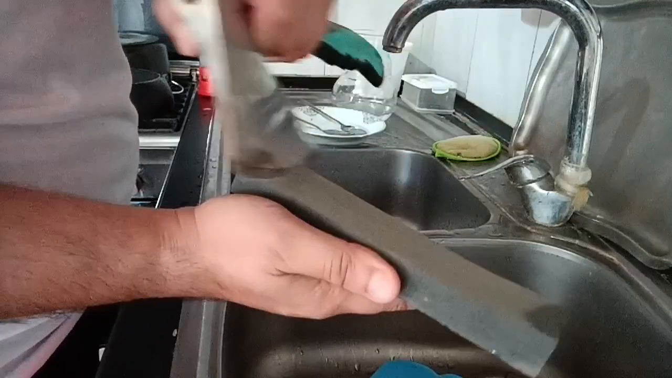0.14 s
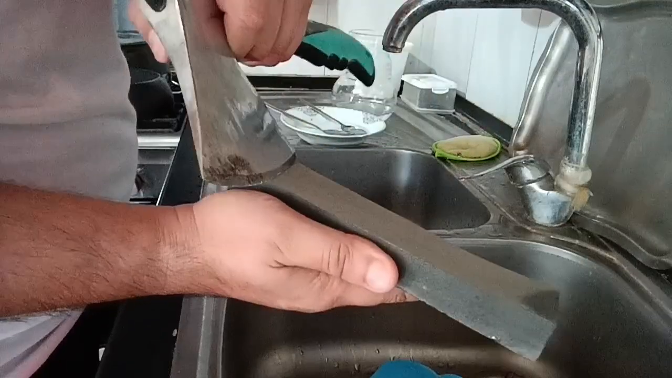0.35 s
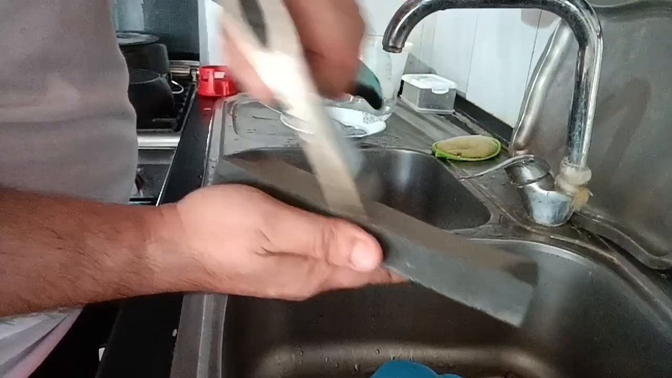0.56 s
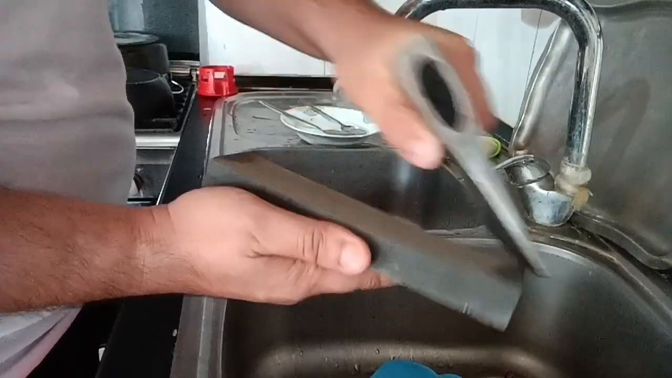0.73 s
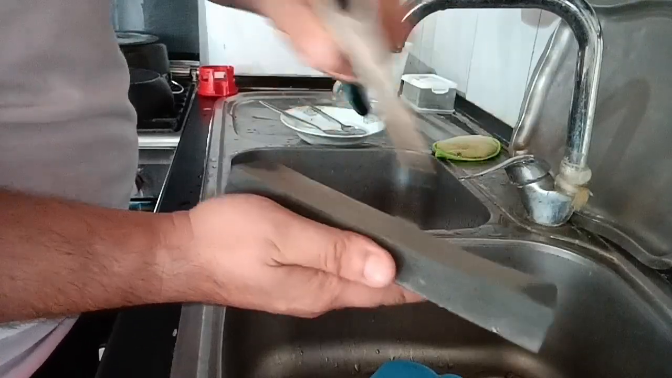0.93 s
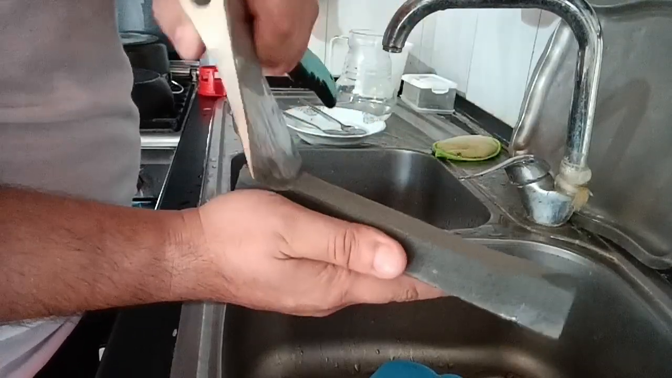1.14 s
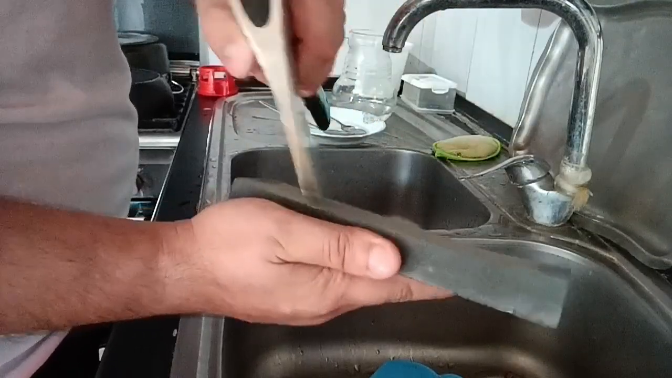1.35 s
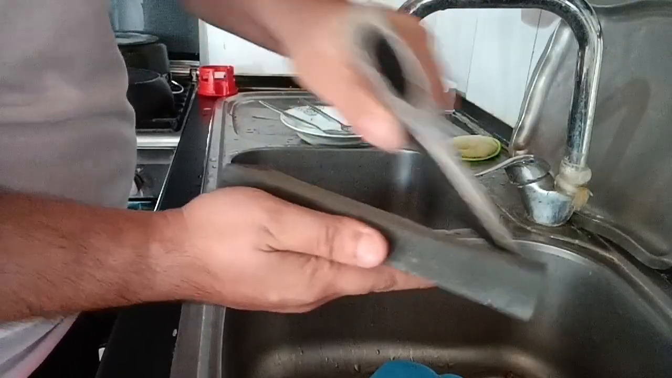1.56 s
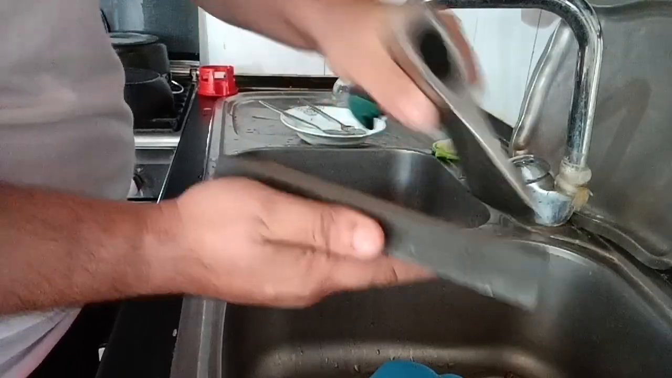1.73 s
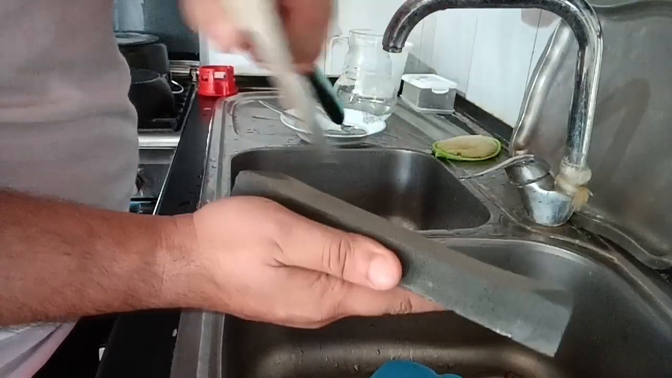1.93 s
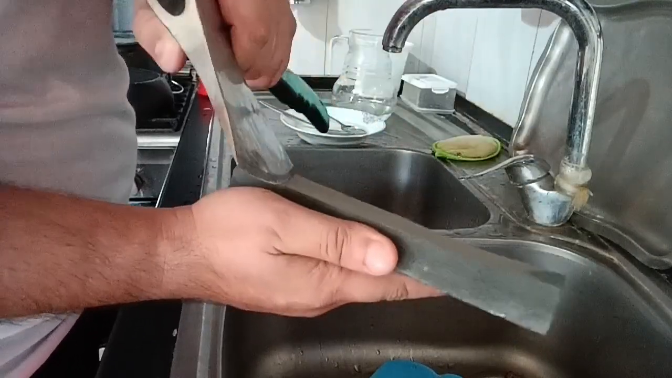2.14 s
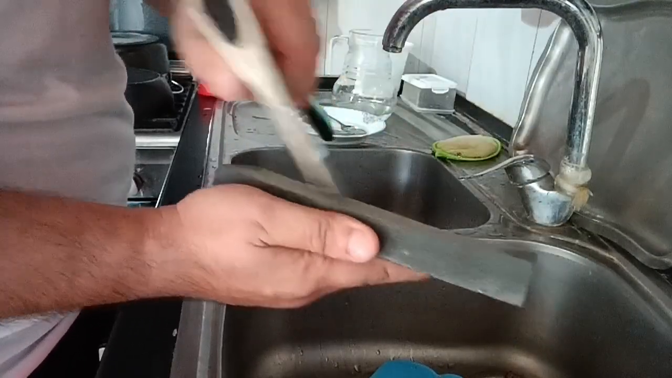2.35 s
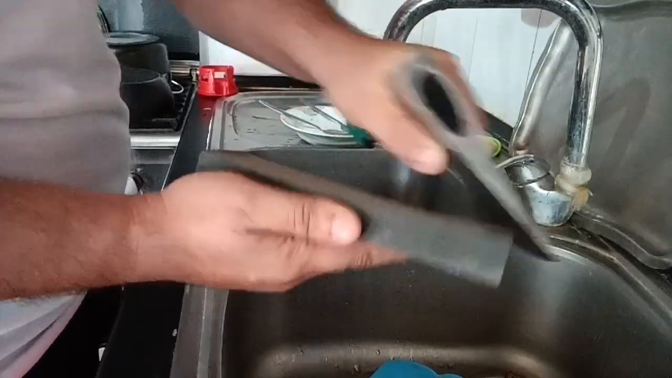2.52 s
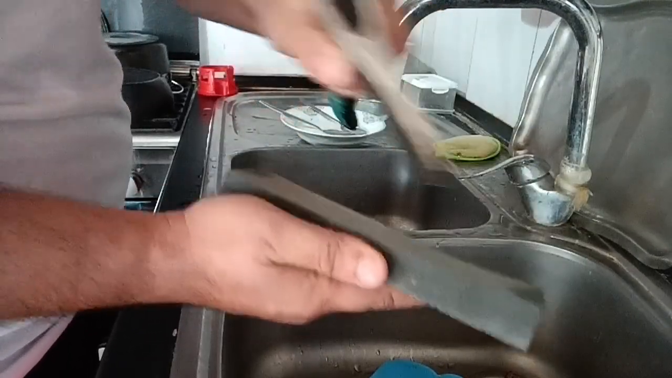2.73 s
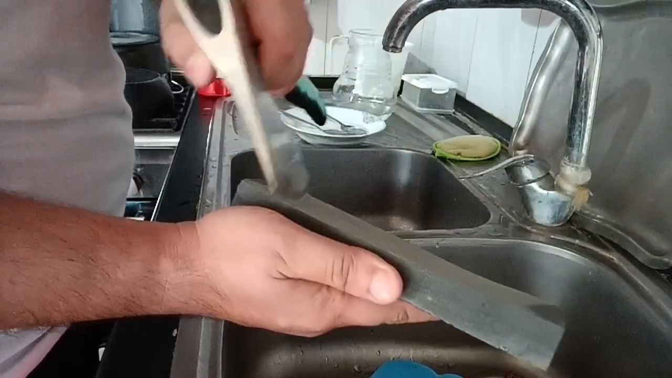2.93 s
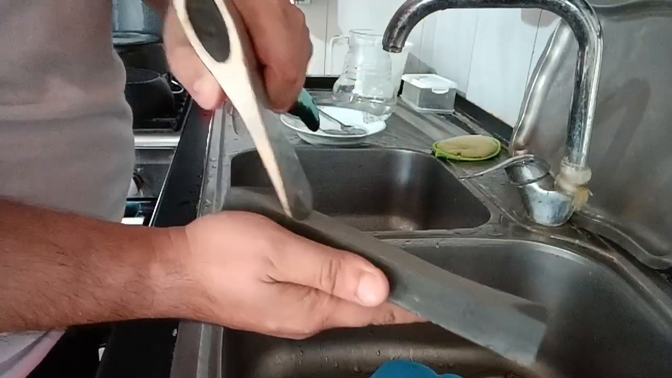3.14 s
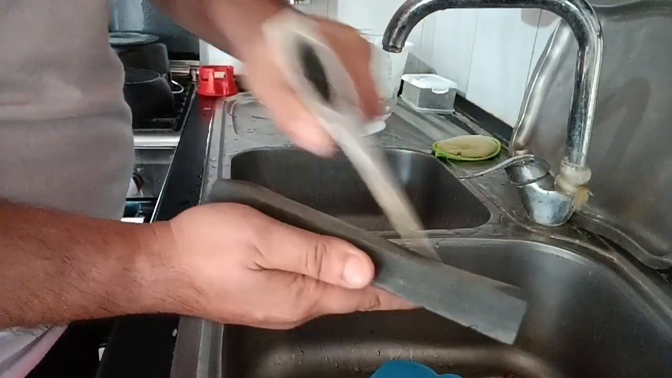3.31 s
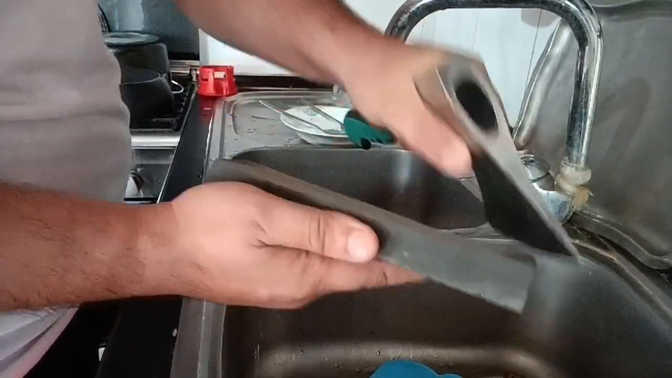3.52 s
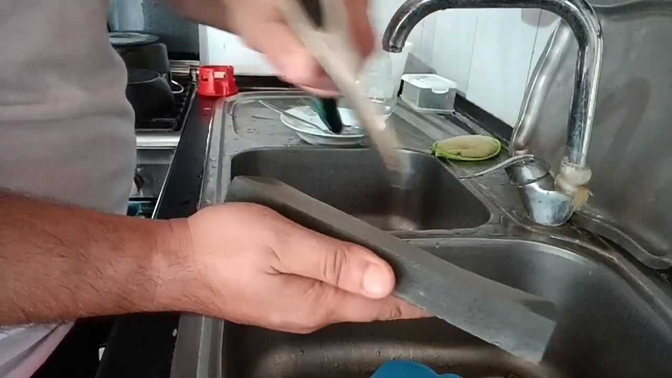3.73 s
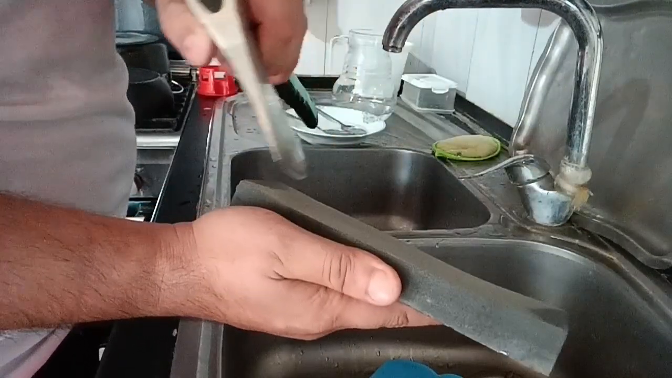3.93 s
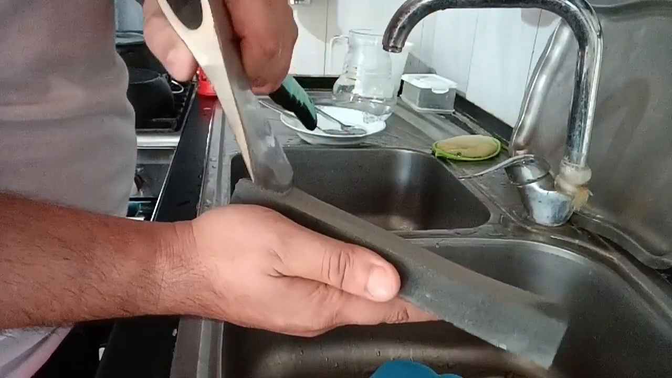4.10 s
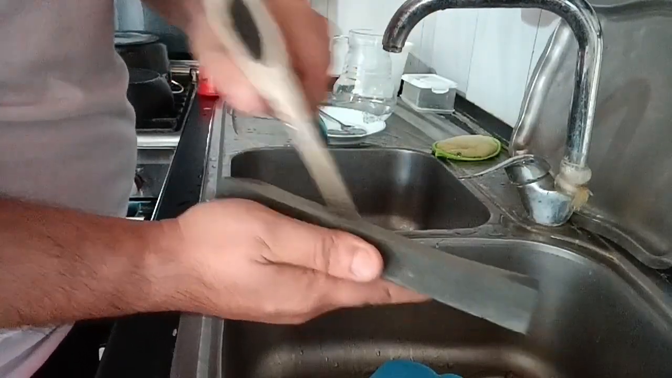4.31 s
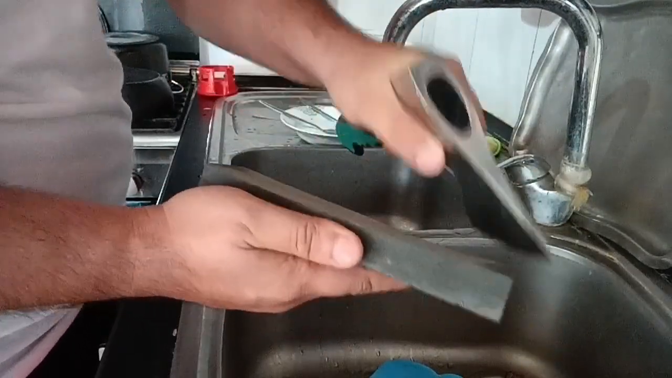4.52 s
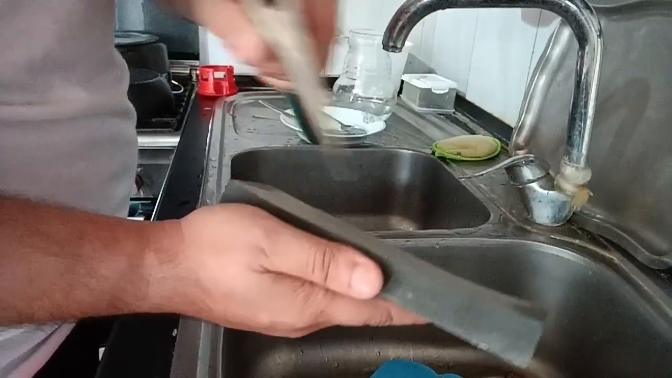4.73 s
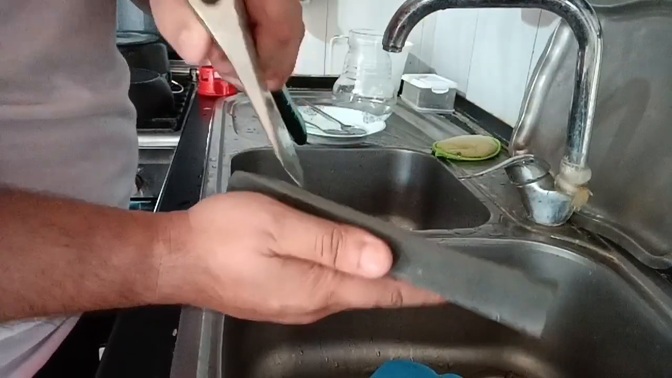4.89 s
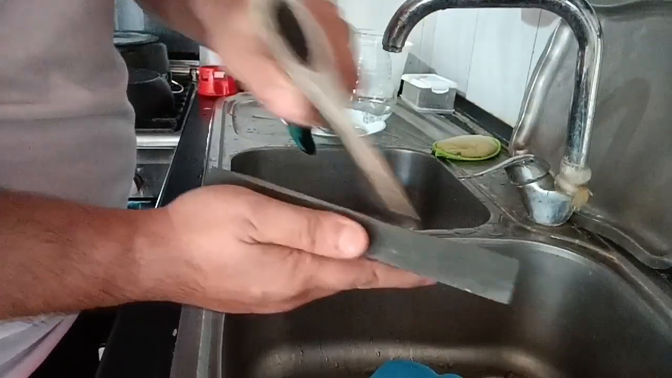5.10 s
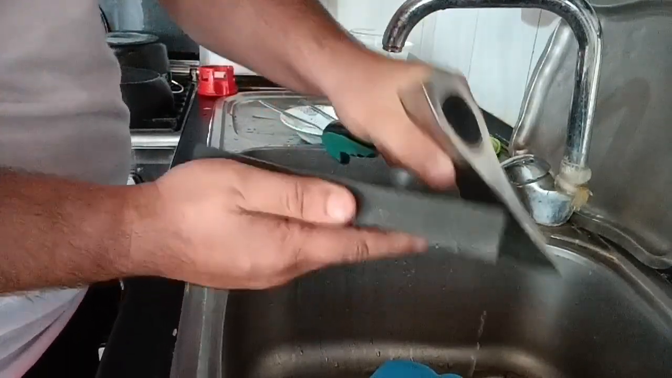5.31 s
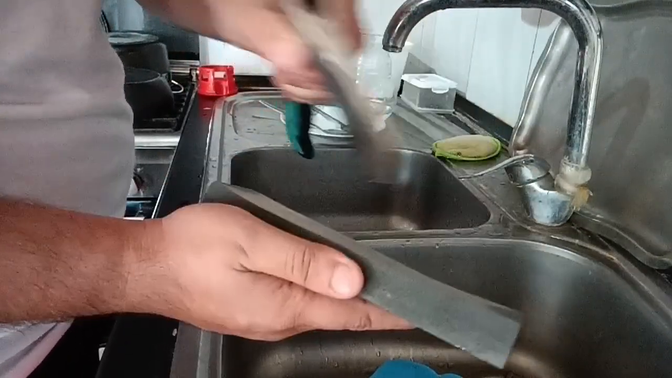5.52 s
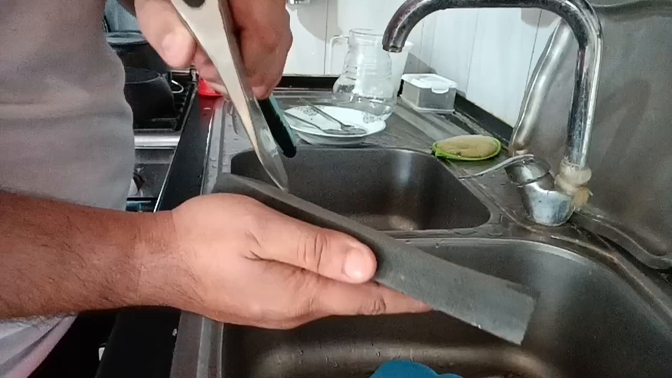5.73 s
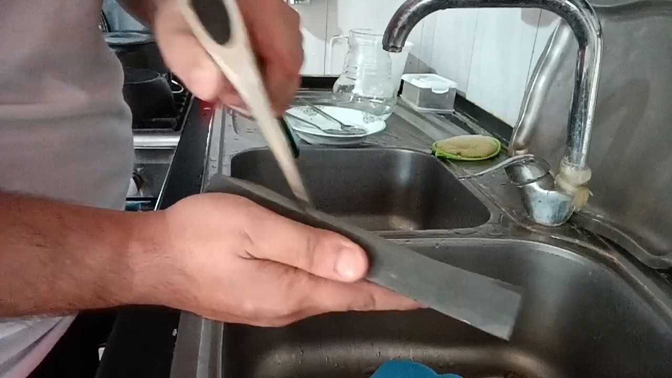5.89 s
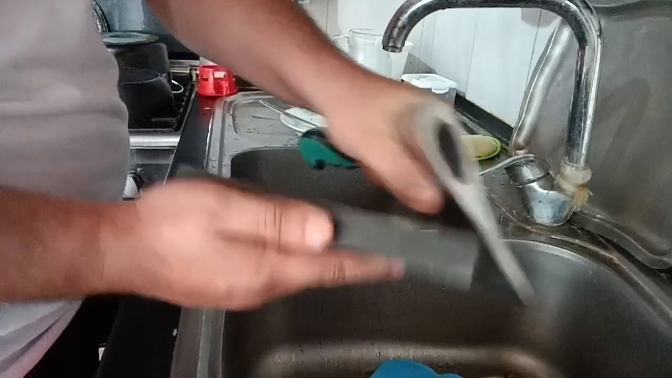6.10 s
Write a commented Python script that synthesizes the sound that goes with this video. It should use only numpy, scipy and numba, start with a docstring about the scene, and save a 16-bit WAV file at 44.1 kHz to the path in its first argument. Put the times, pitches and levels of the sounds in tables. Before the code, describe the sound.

A steel blade is sharpened on a wet, hand-held stone over a kitchen sink. Seven times, about once a second, the edge lands with a light knock, scrapes along the stone with a growing gritty hiss and slips off with a brief metallic ring. Short pauses separate the strokes. The sound is close, with slight room reverberation and a faint appliance hum.

```python
"""A steel blade is sharpened on a wet whetstone held over a sink in a tiled kitchen.
At first its ring dies away over room air and an appliance's faint hum and whine. Then, seven times,
the edge lands with a knock and is pushed along the stone: grit forces the blade's modes, which the
load stiffens and damps, until the edge slips off the end and they ring free.
The room reverberates throughout, and a faint tick comes before some of the landings."""
import sys
import numpy as np
from scipy import signal
from scipy.fft import rfft, irfft, next_fast_len
from scipy.io import wavfile
from scipy.ndimage import uniform_filter1d, map_coordinates
from numba import njit

SR = 44100
rng = np.random.default_rng(int(sys.argv[2]) if len(sys.argv) > 2 else 0)


def unload_wav(signal):
    """Save mono or channel-first audio to the path in sys.argv[1] as 16-bit WAV at rate SR, clipped to [-1, 1]."""
    wavfile.write(
        sys.argv[1],
        SR,
        np.round(np.clip(np.atleast_2d(signal).T, -1, 1) * 32767).astype(np.int16),
    )


N = 275694
LEAD = SR // 4  # samples computed before t = 0
M = N + LEAD

# spectrum of the room air: f/Hz, relative level/dB
AIR_SPECTRUM = [(20, -21.5), (45, -12), (65, -7.5), (130, -0.5), (300, -6), (420, -8.5), (1000, -16.5),
                (3000, -23.5), (4500, -34), (7000, -30), (10000, -39.5), (16000, -40.5)]
# appliance tones: f/Hz, drift/Hz, waver/dB, level/dB
HUM_TONES = [(99.5, 1.5, 3, -63), (150, 2, 4, -74), (342, 2, 4, -72), (3365, 1.2, 2, -87),
             (6400, 1.2, 2, -90), (6600, 1.2, 2, -92)]
# blade modes: free f/Hz, rise at full load/Hz, level within family/dB, free T60/s, loaded T60/s
BLADE_MODES = [(1483, 25, 0, .17, .045), (1512, 125, -1, .13, .04), (2620, 140, -6, .08, .02),
               (3900, 60, -10, .13, .025), (3985, 100, -8, .11, .022), (4918, 150, 0, .235, .022),
               (1780, 60, -13, .08, .02), (2960, 110, -9, .08, .02), (3140, 60, -12, .08, .025),
               (3390, 60, -15, .06, .02), (5540, 30, -20, .08, .03), (6250, 60, -15, .05, .012),
               (6520, 50, -12, .07, .016), (6750, 40, -16, .07, .025), (7320, 70, -9, .08, .013),
               (8960, 70, -10, .17, .03), (9740, 30, -26, .1, .05), (11200, 40, -26, .08, .025),
               (12630, 40, -20, .1, .03), (12850, 90, -18, .03, .008), (13790, 100, -17, .14, .02)]
# boundaries of the six families of modes: f/Hz
FAMILY_EDGES = [2200, 2800, 3600, 4500, 5400]
# reverberation time of the kitchen: f/Hz, T60/s
ROOM_DECAY = [(300, 0.12), (1500, 0.35), (6000, .25), (11000, 0.25), (15000, .13)]
# faint ticks: t/s, level/dB, f/Hz
TICKS = [(.159, -68, 550), (.995, -62, 930), (3.887, -67.5, 620), (5.534, -73, 2900)]
# edge meets stone: t/s, level/dB, then relative to it treble/dB, thud/dB, 5 kHz mode/dB, clack/dB
LANDINGS = [(0.339, -15, -24, -15, -28, -7.5), (1.22, -12.5, -36, -10.5, -25.5, -8.5),
            (2.176, -13, -20.5, -16.5, -14.5, 1), (3.061, -5, -28, -17.5, -25, -3),
            (4.216, -13, -26.5, -14, -34, -11), (5.01, -12.5, -18.5, -4, -17, 10.5),
            (5.89, -22.5, -16.5, -4.5, -30, 9)]
# resonances of the stone: f/Hz, bandwidth/Hz, level/dB
STONE_MODES = [(281.5, 88, 2.5), (359, 66, -5), (429, 10, 10.5), (635.8, 20, 14), (841.3, 11, 17),
               (980, 1300, 1), (1230, 22, -17.5)]
# resonances of stone and hand under a blow: f/Hz, bandwidth/Hz, level/dB
CLACK_MODES = [(1030, 380, -7), (1550, 450, 0), (2620, 450, -6), (3900, 600, -7)]
# scrape contour of the stroke that ends just before t = 0: t/s, low level/dB, upper level/dB
OPENING_CONTOUR = [(-.2, -26, -36), (-.07, -32.5, -26)]
# scrape contours, one for each later stroke: t/s, low level/dB, upper level/dB
CONTOURS = [
    [(0.36, -44.5, -60), (0.432, -55.5, -66), (0.518, -40, -26.5), (0.56, -33.5, -28.5),
     (0.582, -26, -24.5), (0.598, -30, -26), (0.638, -32, -25), (0.796, -25.5, -22.5), (0.815, -28.5, -31)],
    [(1.24, -35, -37.5), (1.278, -41, -36), (1.328, -41, -30.5), (1.368, -24.5, -25.5), (1.396, -33, -42),
     (1.424, -28.5, -19.5), (1.442, -35.5, -33), (1.468, -26, -14), (1.5, -27, -26.5), (1.52, -32.5, -23.5),
     (1.544, -30.5, -27), (1.634, -30, -21.5), (1.658, -32, -24), (1.698, -29, -20.5), (1.715, -21, -33)],
    [(2.2, -31.5, -36), (2.22, -37.5, -41.5), (2.276, -47.5, -52.5), (2.35, -30.5, -24.5),
     (2.392, -36, -28.5), (2.506, -22.5, -23), (2.55, -40.5, -21), (2.578, -17.5, -21.5), (2.6, -31, -26)],
    [(3.085, -32.5, -35), (3.101, -44, -42), (3.165, -46.5, -46), (3.193, -47, -31.5),
     (3.255, -33.5, -33.5), (3.429, -26, -18), (3.457, -25.5, -19), (3.485, -24, -23.5), (3.51, -30, -21)],
    [(4.235, -31.5, -42), (4.251, -39.5, -43), (4.281, -37.5, -34), (4.403, -30, -25.5),
     (4.417, -28, -30.5), (4.431, -23.5, -26.5), (4.507, -28.5, -21), (4.543, -21, -23),
     (4.56, -27.5, -28.5)],
    [(5.03, -25.5, -28), (5.046, -31, -33), (5.072, -33, -34.5), (5.096, -30, -26.5), (5.14, -26.5, -26.5),
     (5.252, -28.5, -23), (5.268, -20, -22), (5.292, -22.5, -20), (5.31, -25, -28)],
    [(5.905, -36, -33.5), (5.963, -46.5, -36), (6.019, -26, -26.5), (6.033, -32, -27), (6.055, -21, -27),
     (6.129, -39.5, -17), (6.147, -20.5, -20.5), (6.161, -22.5, -20), (6.175, -31.5, -29)],
]
# every stroke, the opening one first: landing load/1, full load/1, build/s, hold/s,
# time from end of hold to slip-off/s, 5 kHz boost at slip-off/dB, treble/dB
STROKES = [(.5, 0.7, .03, .01, 0.086, 3, -5), (0, .95, 0.099, 0.056, 0.087, 15.5, 2.8),
           (.12, .9, .25, .04, .1, -4.5, 1), (.12, 1, .1, .04, .085, 2, 0),
           (.12, 0.9, 0.12, 0.13, .11, -3.5, -0.5), (0.2, 0.85, 0.14, 0.081, 0.08, -2.5, 0.9),
           (0.5, 0.83, .06, .09, .11, 13, 1.8), (0.52, 0.71, 0.066, 0.058, 0.094, 11, 0.8)]
# rows are hiss, rumble and the low, 2.6, 3, 4, 5 kHz and high families: middling level/dB,
# slope on low level/1, slope on upper level/1, change at full load/dB, drift/(dB/s)
LAYERS = [(-48, -0.14, 1.3, -2.2, 9.5), (-40, 0.23, 0.48, 2.5, -2), (-26.5, 1.04, 0.15, 3.5, 0.9),
          (-38.5, 0.21, 0.87, 4.5, -13), (-31.5, 0.25, 0.9752, -2.55, 19), (-35, 0.04, 1.06, -1, 0.5),
          (-39, 0.14, 0.86, 6, -11), (-33.5, 0.09, 1.18, -0.2, 4.5)]
# spectrum of the grit hiss: f/Hz, relative level/dB
GRIT_SPECTRUM = [(200, -35.5), (700, -109), (2000, -21.5), (3500, 16), (7000, -2.5), (10500, 0.5),
                 (13000, 0), (15500, -5.5)]

AIR_DB, ROOM_DB, TOP_HZ = -63, -15, 15750
SINGING_MODE, NODE_DB = 5, 3  # row of the 5 kHz mode; wander of each mode's drive
EASE_S, EASE_LOAD, RIM_LOAD = .07, .15, .4  # the hand eases, then the edge catches the rim
SLIP_S = .03  # rise time of the slip-off boost
MID_LOW_DB, MID_UPPER_DB = -29, -28  # contour levels of a middling scrape


def amp(db):
    """Amplitude ratio: a factor of ten per 20 dB."""
    return 10 ** (np.asarray(db) / 20)


def unit(x):
    """Normalisation to rms 1."""
    return x / np.sqrt(np.mean(x ** 2) + 1e-20)


def along(points, hz):
    """Interpolation of (f/Hz, value) points on a logarithmic frequency axis."""
    f, value = np.transpose(points)
    return np.interp(np.log(hz + 1), np.log(f + 1), value)


def at(s):
    """Sample index of a time, counting the lead."""
    return int(round(s * SR)) + LEAD


def wobble(rate):
    """Slow random modulation: a spline through rate knots a second."""
    knots = rng.standard_normal(int(M * rate / SR) + 4)
    coarse = map_coordinates(knots, [np.arange(0, M, 16) * rate / SR])
    return np.repeat(coarse, 16)[:M]


def filtered(x, response):
    """Linear filtering: the spectrum is multiplied by a frequency response."""
    size = next_fast_len(x.shape[-1] + SR // 2)
    return irfft(rfft(x, size) * response(np.fft.rfftfreq(size, 1 / SR)), size)[..., :x.shape[-1]]


def resonate(x, modes):
    """Modal superposition: x drives second-order resonances of alternating sign."""
    return filtered(x, lambda f: sum((-1) ** k * amp(db) * 1j * f * width / (hz**2 - f**2 + 1j * f * width)
                                     for k, (hz, width, db) in enumerate(modes)))


def background():
    """Random modulation: the noise of room air and an appliance's tones waver slightly."""
    air = unit(filtered(rng.standard_normal(M), lambda f: amp(along(AIR_SPECTRUM, f))))
    out = air * amp(AIR_DB + .56 * wobble(.17) + .79 * wobble(6))
    for hz, drift_hz, waver_db, db in HUM_TONES:
        rms = uniform_filter1d(amp(db + waver_db * wobble(6.5)), size=32)
        phase = 2 * np.pi * np.cumsum(hz + drift_hz * wobble(29)) / SR
        out += rms * np.sqrt(2) * np.sin(phase)
    return out


@njit
def ring(rub, blows, load, omega, rise, gain, free_loss, loaded_loss):
    """Forced damped oscillators whose frequency and loss follow the load; rates are per sample."""
    out = np.zeros(len(load))
    for k in range(len(omega)):
        z = 0j
        for i in range(len(load)):
            if i % 16 == 0:
                loss = free_loss[k] + (loaded_loss[k] - free_loss[k]) * load[i]
                pole = np.exp(-loss + 1j * (omega[k] + rise[k] * load[i]))
                feed = 2 * np.sqrt(loss)  # keeps the rubbed level independent of damping
            z = z * pole + feed * rub[k, i] + blows[k, i]
            out[i] += gain[k] * z.imag
    return out


def blade(rub, blows, load, family):
    """Contact loading: the stone adds stiffness and damping to the blade's modes."""
    hz, rise_hz, db, free_t60, loaded_t60 = np.transpose(BLADE_MODES)
    gain = amp(db) / np.sqrt(np.bincount(family, amp(db) ** 2))[family]  # unit power per family
    decay, turn = np.log(1000) / SR, 2 * np.pi / SR
    seat = np.clip(load * (1 + .15 * wobble(30)), 0, 2)  # the edge trembles on the stone
    return ring(rub, blows, seat, turn * hz, turn * rise_hz, gain, decay / free_t60, decay / loaded_t60)


def radiate(x, corner_hz):
    """Radiation efficiency: a small body gives off little bass."""
    return filtered(x, lambda f: (1j * f / (corner_hz + 1j * f)) ** 4)


def kitchen(x):
    """Reverberation: convolution with a diffuse tail in which each frequency decays at its own rate."""
    hz, t, spectrum = signal.stft(rng.standard_normal(SR // 2), SR, nperseg=256)
    tail = signal.istft(spectrum * amp(-60 * t / along(ROOM_DECAY, hz)[:, None]), SR, nperseg=256)[1]
    return signal.fftconvolve(np.pad(x, (200, 0)), tail / np.linalg.norm(tail))[:M]


def ticks():
    """Exponential decay: a brief tone with a little noise is heard as a tick."""
    out, t = np.zeros(M), np.arange(SR // 20) / SR
    for s, db, hz in TICKS:
        hiss = uniform_filter1d(rng.standard_normal(len(t)), size=4)
        out[at(s):][:len(t)] += amp(db - 60 * t / .071) * (2.7 * np.sin(2 * np.pi * hz * t) + .3 * hiss)
    return out


def landings(mode_hz):
    """Impact excitation: each landing gives short forces for the blade's modes, thud, crack and clack."""
    blows = np.zeros((len(mode_hz), M))
    thud, crack, clack = np.zeros((3, M))
    t = np.arange(SR // 10) / SR
    treble_share = np.clip(np.log2(mode_hz / 2500) * 2, 0, 1)  # soft contact feeds upper modes less
    for s, db, treble_db, thud_db, sing_db, clack_db in LANDINGS:
        span = slice(at(s), at(s) + len(t))
        strength = amp(db - .5 + treble_share * (treble_db + 6))
        strength[SINGING_MODE] = amp(db + sing_db + 8.5)
        chatter = amp(-60 * t / .015) * rng.standard_normal(len(t))  # the edge settles
        chatter[0] = 9  # the first touch is the hardest
        chatter /= np.linalg.norm(chatter)
        push = uniform_filter1d(chatter, size=7, mode="constant", origin=3)  # rounded by the blade's mass
        blows[:, span] += strength[:, None] * np.where(mode_hz[:, None] < FAMILY_EDGES[-2], push, chatter)
        thud[span] += amp(db + thud_db + 26.5) * push
        rattle = (1 - np.exp(-t / .0012)) * rng.standard_normal((2, len(t)))
        crack[span] += amp(db + treble_db - 2 - 60 * t / .026) * rattle[0]
        clack[span] += amp(db + clack_db + 6.5 - 60 * t / .086) * uniform_filter1d(rattle[1], size=4)
    return blows, thud, crack, clack


def whetstone(thud, clack, grit, rumble_gain):
    """Forced resonance: the hand-held stone knocks under blows and rumbles under grit."""
    knock = resonate(thud, STONE_MODES) + resonate(clack, CLACK_MODES)
    return knock + rumble_gain * unit(resonate(grit, STONE_MODES))


def hand():
    """Amplitude envelopes: the gain of each layer, then the load on the edge; zero between strokes."""
    out, t = np.zeros((len(LAYERS) + 1, M)), (np.arange(M) - LEAD) / SR
    base_db, per_low, per_upper, load_db, drift = np.transpose(LAYERS)[:, :, None]
    for contour, stroke in zip([OPENING_CONTOUR, *CONTOURS], STROKES):
        first, full, build_s, hold_s, release_s, slip_db, treble_db = stroke
        s, low, upper = np.transpose(contour)
        span = slice(max(at(s[0] - .03), 0), at(s[-1] + .03))
        left_s = s[-1] - t[span]
        low_db = np.interp(t[span], s, low) - MID_LOW_DB
        upper_db = np.interp(t[span], s, upper) - MID_UPPER_DB
        touch = np.clip(np.minimum((t[span] - s[0]) / .01 + 1, left_s / .008 + 1), 0, 1)
        turns_s = [-release_s - hold_s - build_s, -release_s - hold_s, -release_s, EASE_S - release_s, 0]
        load = np.interp(-left_s, turns_s, [first, full, full, EASE_LOAD, RIM_LOAD])
        db = base_db + per_low * low_db + per_upper * upper_db + load_db * load - drift * left_s
        db[[0, -1]] += treble_db  # hiss and high family
        db[-2] += slip_db * np.clip(1 - left_s / SLIP_S, 0, 1)  # 5 kHz family
        out[:, span] = [*touch ** 2 * amp(db), touch * load]
    return out


def grit_contacts():
    """Shot noise: dense grit contacts of uneven size, in clumps."""
    size = amp(1.4 * rng.standard_normal(M)) * (rng.random(M) < .45)
    return unit(size * rng.standard_normal(M) * amp(2.2 * wobble(35) + 2.2 * wobble(160)))


def friction(grit, mode_gains):
    """Modal coupling: each mode's noisy drive wanders as the contact point crosses its nodes."""
    coupling = amp(NODE_DB * np.array([wobble(8) for _ in mode_gains]))
    return mode_gains * coupling * (.5 * grit + 1.007 * rng.standard_normal(mode_gains.shape))


def grit_hiss(grit, depth_db):
    """Friction noise: a bright hiss that flickers in random patches of time and frequency."""
    spectrum = signal.stft(grit, nperseg=256)[2]
    patches = uniform_filter1d(rng.standard_normal(spectrum.shape), size=4, axis=0)
    patches = uniform_filter1d(patches, size=10, axis=1)
    flicker = signal.istft(spectrum * amp(depth_db * unit(patches)), nperseg=256)[1][:M]
    return unit(filtered(flicker, lambda f: amp(along(GRIT_SPECTRUM, f))))


def scene():
    """Superposition: direct sound, its reverberation and the background add at one point."""
    mode_hz = np.transpose(BLADE_MODES)[0]
    family = np.searchsorted(FAMILY_EDGES, mode_hz)
    hiss_gain, rumble_gain, *family_gains, load = hand()
    grit = grit_contacts()
    rub = friction(grit, np.array(family_gains)[family])
    blows, thud, crack, clack = landings(mode_hz)
    steel = amp(-2.5) * blade(rub, blows, load, family)
    edge = amp(7.5) * hiss_gain * grit_hiss(grit, depth_db=5) + resonate(crack, [(5000, 4500, 1.5)])
    stone = whetstone(thud, clack, grit, rumble_gain)
    direct = radiate(steel, corner_hz=583) + radiate(edge + stone, corner_hz=99) + ticks()
    return (direct + amp(ROOM_DB) * kitchen(direct) + background())[None, LEAD:]


def record(dry):
    """Band limiting: a steep low-pass at TOP_HZ."""
    return filtered(dry, lambda hz: np.clip((TOP_HZ - hz) / 150 + .5, 0, 1) ** 2)


dry = scene()
out = record(dry)
unload_wav(out)
```